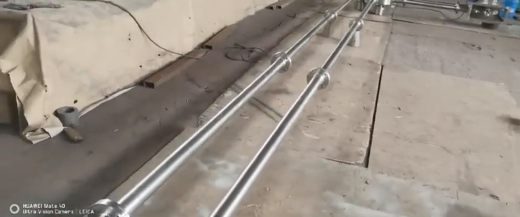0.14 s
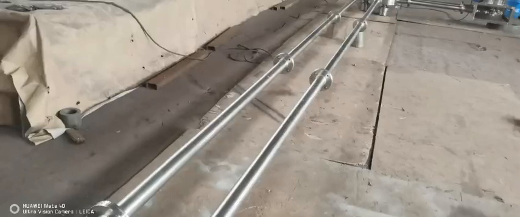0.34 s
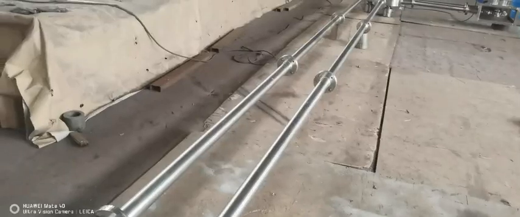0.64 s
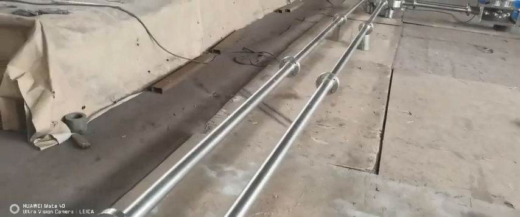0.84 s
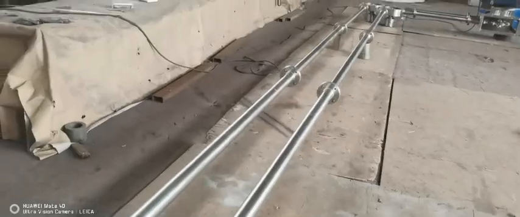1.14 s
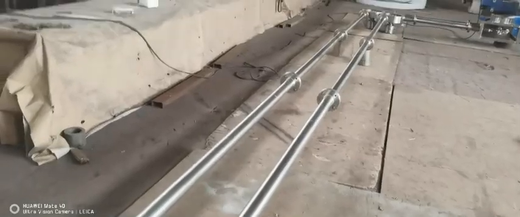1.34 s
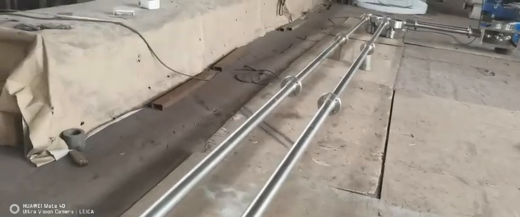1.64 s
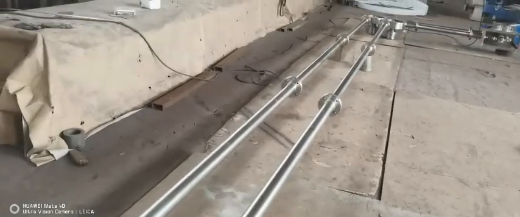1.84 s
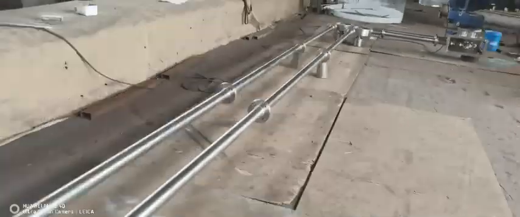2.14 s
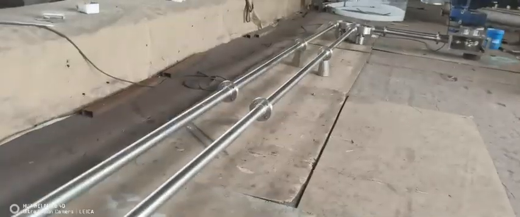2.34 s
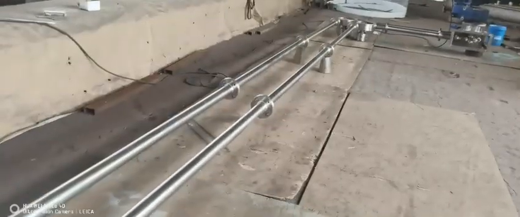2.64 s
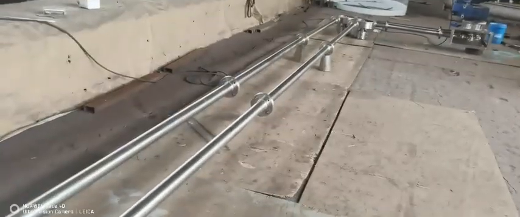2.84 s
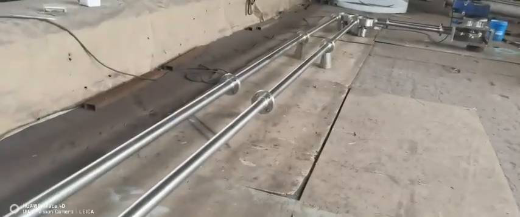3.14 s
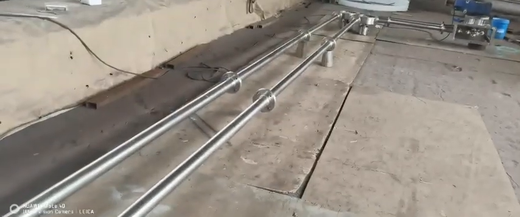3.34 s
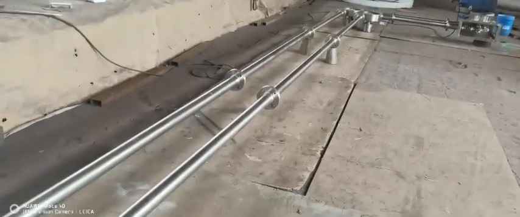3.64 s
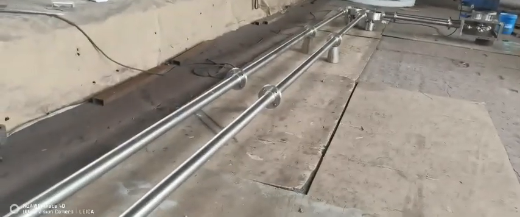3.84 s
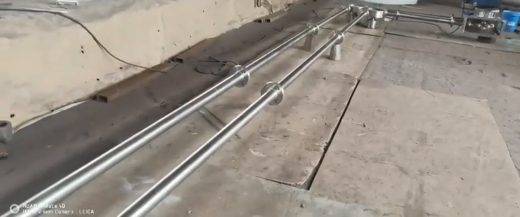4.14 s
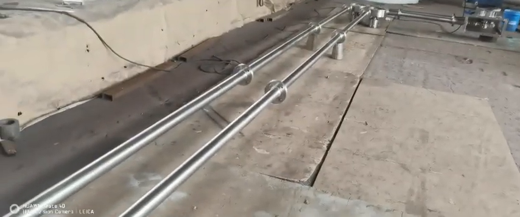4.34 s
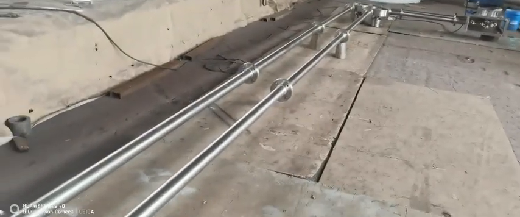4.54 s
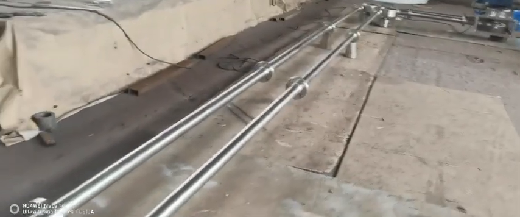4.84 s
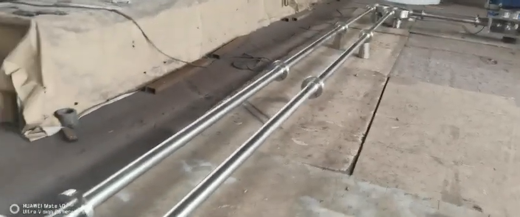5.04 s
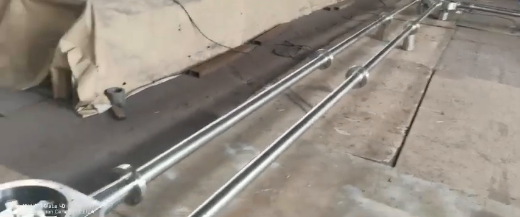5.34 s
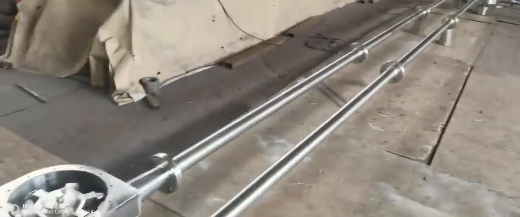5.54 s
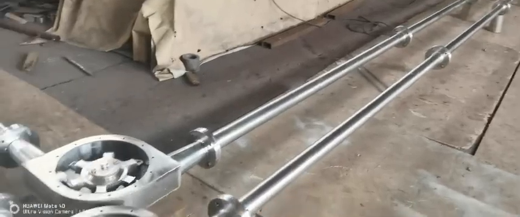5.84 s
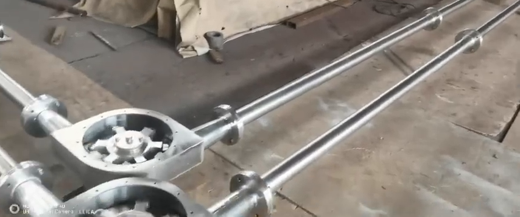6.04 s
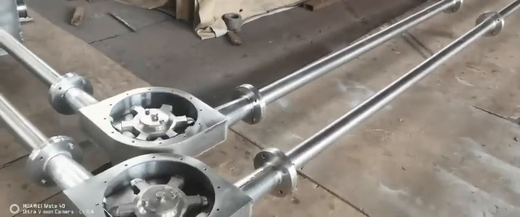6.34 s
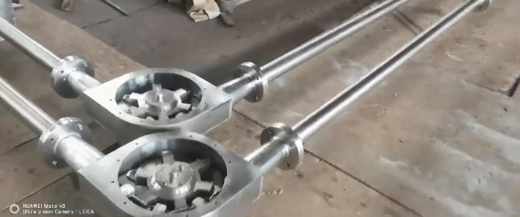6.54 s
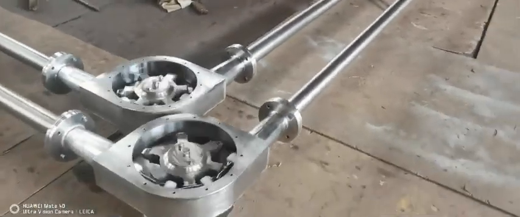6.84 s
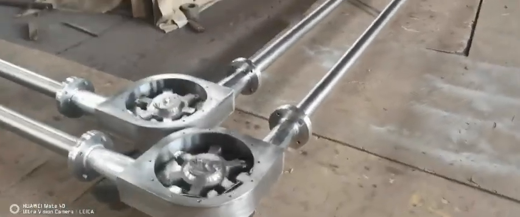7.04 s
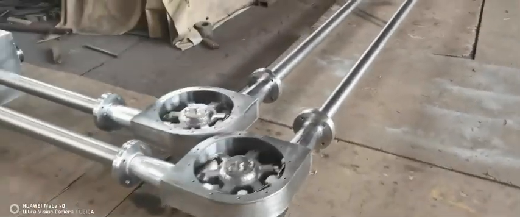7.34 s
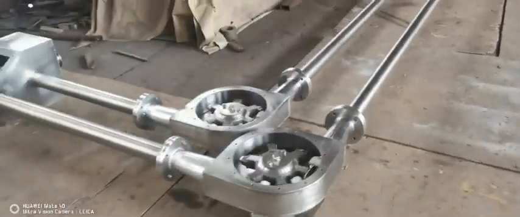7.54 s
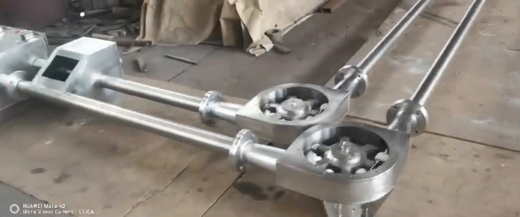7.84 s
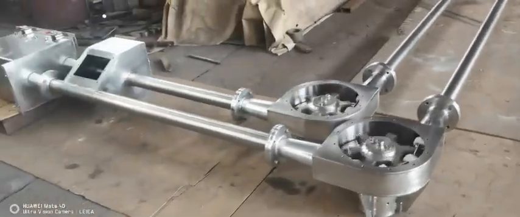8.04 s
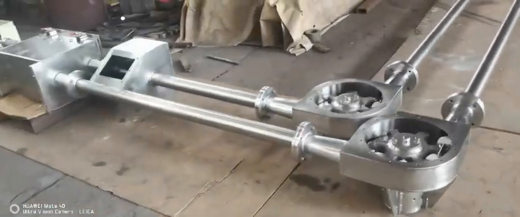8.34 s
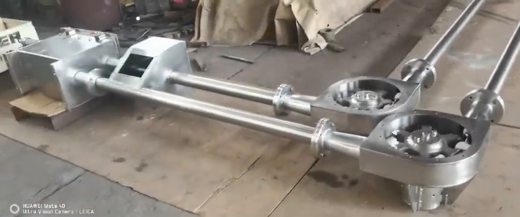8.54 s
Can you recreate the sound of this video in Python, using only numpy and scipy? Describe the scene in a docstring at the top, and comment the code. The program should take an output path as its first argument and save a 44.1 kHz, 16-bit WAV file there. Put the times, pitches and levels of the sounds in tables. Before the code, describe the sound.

A chain conveyor runs close by in a factory hall for nearly nine seconds. Its discs rub inside steel tubes with a steady low booming hum and soft irregular thuds, strongest around 3.9 and 6.6 seconds, while links tick lightly over the sprockets until about 6.3. Behind it lie a machine rumble, hiss and thin, gliding high motor whines. At about 1.9 seconds something heavy is dragged with a short broad roar. A distant grinder hisses on metal from 2.2 to 3.4, from 4.1 to 5.4 and more lightly from 6.5 to 8 seconds, its whine sagging under load and recovering. At 4.7 seconds a hollow housing is knocked once, and a second drag swells and dulls away by 5.6. Rubbed steel rings faintly here and there, with a run of short ringing tones from 7.4 seconds to the end.

```python
"""A tubular chain conveyor runs on a factory floor: discs rub and thud through the steel tube, which booms low,
and links tick over the sprockets. Farther off the hall murmurs, motors whine, rubbed steel and the ground work
ring, and a grinder hisses and bogs down when pressed on the work. Twice something heavy is dragged with a broad
roar; once a hollow housing is knocked."""
import sys
import numpy as np
from scipy import signal
from scipy.fft import rfft, irfft
from scipy.io import wavfile
from scipy.ndimage import uniform_filter1d

SR = 44100
rng = np.random.default_rng(int(sys.argv[2]) if len(sys.argv) > 2 else 0)


def dump(signal):
    """Clip the signal to [-1, 1] and save it as 16-bit WAV at the path in sys.argv[1]."""
    limited = np.clip(np.atleast_2d(signal).T, -1, 1)
    pcm = np.round(limited * 32767).astype(np.int16)
    wavfile.write(sys.argv[1], SR, pcm)


N = 383669
TIME_S = np.arange(N) / SR


def amp(db):
    return 10 ** (np.asarray(db) / 20)


def unit_rms(x):
    return x / np.sqrt(np.mean(x ** 2) + 1e-20)


def highpass(x, order, hz):
    return signal.sosfilt(signal.butter(order, hz, "high", fs=SR, output="sos"), x)


def curves(rows):
    """Columns after the time column, interpolated per sample."""
    times_s, *columns = np.transpose(rows)
    return [np.interp(TIME_S, times_s, column) for column in columns]


def drift(rate_hz):
    """Slow unit-rms noise: two one-pole low-passes at SR / 40."""
    r = np.exp(-2 * np.pi * rate_hz * 40 / SR)
    slow = signal.lfilter([1], [1, -2 * r, r * r], rng.standard_normal(N // 40 + 2002))[2000:]
    return np.interp(np.arange(N) / 40, np.arange(len(slow)), unit_rms(slow))


def resonate(x, hz, width_hz):
    """One resonance, unit peak gain."""
    r = np.exp(-np.pi * width_hz / SR)
    poles = [1, -2 * r * np.cos(2 * np.pi * hz / SR), r * r]
    return signal.lfilter([(1 - r * r) / 2, 0, (r * r - 1) / 2], poles, x + 1e-18)


def body(x, modes):
    """Parallel resonances, alternating signs."""
    return sum((-1) ** k * amp(db) * resonate(x, hz, width_hz)
               for k, (hz, width_hz, db) in enumerate(modes))


def strike(blows, modes, spread_db):
    """Each blow rings every mode at a random strength."""
    times_s, levels_db = np.transpose(blows)
    scatter_db = spread_db * rng.normal(0, 1, (len(blows), len(modes)))
    out = np.zeros(N)
    for k, (hz, db, t60_s) in enumerate(modes):
        clicks = np.zeros(N)
        clicks[(times_s * SR).astype(int)] = amp(levels_db + db + scatter_db[:, k])
        r, w = amp(-60 / (t60_s * SR)), 2 * np.pi * hz / SR
        out += signal.lfilter([0, np.sin(w)], [1, -2 * r * np.cos(w), r * r], clicks + 1e-18)
    return out


def coloured_noise(spectrum, flicker_db, tilt_db_oct=0.0):
    """Flickering fifth-octave noise bands, tilted above 1.5 kHz."""
    points_hz, points_db = np.transpose(spectrum)
    edges_hz = points_hz[0] * 2 ** np.arange(0, np.log2(points_hz[-1] / points_hz[0]) + .1, 1 / 5)
    white, common = rng.standard_normal((2, N)), drift(4.5)
    out = power = 0
    for k, (low, high) in enumerate(zip(edges_hz, edges_hz[1:])):
        hz = np.sqrt(low * high)
        db = np.interp(np.log(hz), np.log(points_hz), points_db)
        band = signal.sosfilt(signal.butter(2, [low, high], "band", fs=SR, output="sos"), white[k % 2])
        power += amp(2 * db) * np.mean(band ** 2)
        wander_db = flicker_db * (0.38 * common + drift(7.5))
        out += band * amp(db + wander_db + tilt_db_oct * max(0, np.log2(hz / 1500)))
    return out / np.sqrt(power)


def wavering_tone(hz, blur_hz, steady, flicker_db=3):
    """A tone plus the narrow noise band that hall scattering makes of it."""
    phase = 2 * np.pi * np.cumsum(hz) / SR
    tone = (steady + drift(blur_hz)) * np.sin(phase) + drift(blur_hz) * np.cos(phase)
    return unit_rms(tone) * amp(flicker_db * drift(10.8))


def echoes(x, t60_s, tail_db):
    """Direct sound plus a decaying noise tail; power kept."""
    t = np.arange(int(t60_s * SR)) / SR
    response = rng.standard_normal(len(t)) * amp(-60 * t / t60_s) * (t > .004)
    response *= amp(tail_db) / np.sqrt(np.sum(response ** 2))
    response[0] = 1
    return signal.fftconvolve(x, response)[:len(x)] / np.sqrt(1 + amp(2 * tail_db))


def shifting_ripple(x, t60_s, tail_db, step_s):
    """Short random echoes, redrawn every step, give a shifting, finely rippled colour."""
    hop = int(step_s * SR)
    window = np.hanning(2 * hop + 1)[:-1]
    padded, out = np.pad(x, (hop, 2 * hop)), np.zeros(N + 5 * hop)
    for i in range(0, N + hop, hop):
        stretch = np.pad(padded[i:i + 2 * hop] * window, (0, hop))
        out[i:i + 3 * hop] += echoes(stretch, t60_s, tail_db)
    return out[hop:hop + N]


# steel tube modes: (frequency [Hz], width [Hz], gain [dB])
TUBE_MODES = [(159.8, 16.4, -1), (172.2, 20.2, 1), (221.7, 24.7, -5.5), (301.2, 20, -10.5),
              (111, 19, -18.5)]
# rubbing in the tube: (time [s], level [dB])
RUB_LEVELS = [(0.0, -27), (0.5, -37), (1.5, -32.5), (2.4, -33.5), (3.7, -36.5), (3.95, -26), (4.3, -36),
              (5.0, -31.5), (5.5, -34), (6.5, -33.5), (7.5, -35), (8.7, -35.5)]

def disc_rub(period_s=0.35, tight_s=0.27, throb_db=1):
    """Rubbing discs drive the tube modes; one swell per passing disc."""
    db, = curves(RUB_LEVELS)
    throb = np.cos(2 * np.pi * (TIME_S - tight_s) / period_s)
    return amp(db + throb_db * throb) * unit_rms(body(rng.standard_normal(N), TUBE_MODES))


# hall murmur: (time [s], low part [dB], high part [dB])
MURMUR_LEVELS = [(0.0, -36, -35.5), (0.51, -36.5, -36), (1.74, -33.5, -36), (2.28, -30.5, -31),
                 (3.03, -28.5, -32), (3.7, -33.5, -33.5), (4.31, -31.5, -31.5), (4.75, -27.5, -34),
                 (5.43, -35, -36.5), (6.18, -37, -37.5), (6.98, -35.5, -32), (7.41, -37.5, -31.5),
                 (7.8, -34, -32.5), (8.15, -34, -33), (8.7, -36, -33)]
# spectra of the two parts: (frequency [Hz], relative density [dB])
MURMUR_LOW = [(18, -79), (30, -38), (75, -57), (108, -15.5), (124, -12), (143, -5), (162, -1.5),
              (241, -17.5), (305, -14), (400, -26.5), (520, -17), (823, -15), (1100, -17.5), (1300, -21.5),
              (1690, -62), (2860, -120)]
MURMUR_HIGH = [(1400, -31), (1750, 2), (2100, -1.5), (3300, 2.5), (4200, 1.5), (5800, -1), (7000, 1),
               (8000, -4.5), (8500, -13.5), (9700, -1.5), (11500, -10.5), (14000, -20)]

def hall_murmur():
    """Flickering rumble and hiss."""
    low_db, high_db = curves(MURMUR_LEVELS)
    rumble = amp(low_db) * coloured_noise(MURMUR_LOW, flicker_db=2.5)
    return rumble + amp(high_db) * coloured_noise(MURMUR_HIGH, flicker_db=2.0)


# narrow murmur bands: (time [s], lower band [dB], upper band [dB])
BAND_LEVELS = [(0.0, -46.5, -55), (1.69, -49.5, -62), (1.99, -33, -51), (2.11, -46, -48), (2.32, -39, -51),
               (3.0, -53, -38.5), (3.9, -42.5, -54.5), (4.65, -50, -43), (4.94, -55, -35), (5.31, -67, -43),
               (5.82, -52, -56.5), (6.76, -50.5, -53.5), (7.61, -61, -45), (8.7, -53, -56)]
# their resonances: (frequency [Hz], width [Hz])
BAND_RESONANCES = [(395, 110), (1420, 350)]

def murmur_bands():
    """Two noise bands rise and sink independently."""
    out = 0
    for db, (hz, width_hz) in zip(curves(BAND_LEVELS), BAND_RESONANCES):
        band = resonate(rng.standard_normal(N), hz, width_hz)
        out += amp(db) * unit_rms(resonate(band, hz, width_hz))
    return out


# motor whines, one list each: (time [s], pitch [Hz], level [dB])
MOTOR_CURVES = [
    [(.35, 8030, -53), (.7, 8020, -41), (1.1, 8015, -45), (1.6, 8008, -42), (2.4, 7990, -46),
     (3.5, 7985, -40), (4.35, 8010, -37), (4.7, 8010, -42), (5.0, 8015, -48), (6.25, 8012, -51)],
    [(0, 8125, -46), (.4, 8050, -49), (.7, 8010, -44), (1.2, 7950, -42), (1.9, 7870, -42), (2.1, 7850, -58)],
    [(2.6, 8150, -56), (3.0, 8200, -51), (4.0, 8130, -50), (4.6, 8220, -46), (5.3, 8225, -47),
     (6.0, 8050, -58)],
    [(6.25, 7960, -48), (6.5, 7860, -45), (7.1, 7710, -38), (7.5, 7670, -38), (7.75, 7645, -43),
     (8.0, 7630, -40), (8.25, 7625, -36), (8.7, 7650, -40)],
    [(6.65, 7960, -52), (6.9, 7900, -45), (7.5, 7850, -45), (8.0, 7810, -43), (8.7, 7800, -44)],
]

def motor_whines(fade_s=.02):
    """Gliding motor tones, blurred by the hall."""
    out = 0
    for rows in MOTOR_CURVES:
        hz, db = curves(rows)
        start_s, end_s = rows[0][0], rows[-1][0]
        gate = np.clip(np.minimum(TIME_S - start_s, end_s - TIME_S) / fade_s + 1, 0, 1)
        out += gate * amp(db) * wavering_tone(hz, blur_hz=30, steady=1.3)
    return out


# rings of rubbed steel, and of the workpiece while the grinder presses: (start [s], end [s], pitch [Hz], width
# [Hz], level [dB])
STEEL_RINGS = [(0, .65, 3235, 22, -45), (.78, 1.4, 4850, 20, -45), (1.43, 1.76, 3520, 18, -42),
               (1.7, 1.8, 1715, 40, -42), (2.27, 2.38, 3220, 25, -37), (2.6, 3.9, 3235, 22, -44),
               (2.4, 4.3, 590, 16, -46), (2.0, 4.7, 5200, 50, -48), (0, 1.9, 8650, 30, -53),
               (3.98, 4.27, 10000, 60, -40), (7.43, 7.58, 1620, 20, -42), (7.72, 7.86, 1619, 20, -38),
               (7.92, 8.05, 1614, 20, -40), (8.1, 8.27, 1615, 28, -40), (8.28, 8.46, 1615, 28, -41),
               (8.51, 8.62, 1612, 30, -46), (8.18, 8.62, 3210, 40, -40), (8.22, 8.45, 2935, 25, -43),
               (8.48, 8.7, 2937, 20, -41), (7.76, 7.83, 2170, 40, -38), (4.78, 5.2, 965, 25, -33),
               (5.2, 5.45, 965, 30, -41), (8.56, 8.8, 4658, 22, -40), (8.38, 8.5, 4670, 60, -42),
               (6.4, 6.8, 4550, 60, -48), (.67, .75, 1700, 50, -45), (2.5, 2.8, 2930, 50, -37),
               (2.6, 3.4, 3075, 40, -39), (2.42, 2.95, 4200, 130, -38), (2.55, 2.9, 4720, 25, -43),
               (2.9, 3.45, 2460, 90, -39), (4.3, 4.8, 3000, 170, -34), (4.3, 4.65, 4290, 80, -42),
               (6.8, 6.9, 3320, 60, -39), (6.9, 7.12, 3460, 80, -41), (6.85, 7.08, 2140, 40, -43),
               (7.4, 7.75, 3110, 70, -42), (7.7, 7.92, 3217, 40, -40), (7.5, 7.9, 4495, 30, -42),
               (7.35, 7.8, 4680, 50, -43), (7.25, 7.6, 2760, 60, -46)]

def steel_rings(clear_width_hz=23, fade_share=.3):
    """Steel rings swell and sink back; narrow rings hold as clear tones."""
    out = np.zeros(N)
    for start_s, end_s, hz, width_hz, db in STEEL_RINGS:
        span = slice(int(start_s * SR), int(end_s * SR))
        t = TIME_S[span]
        ramp = np.clip(np.minimum(t - start_s, end_s - t) / (fade_share * (end_s - start_s)), 0, 1)
        phase = 2 * np.pi * hz * t
        ring = (clear_width_hz / width_hz + drift(width_hz)[span]) * np.sin(phase)
        ring += drift(width_hz)[span] * np.cos(phase)
        out[span] += np.sin(np.pi / 2 * ramp) * amp(db) * unit_rms(ring)
    return out


# grinding contact: (time [s], level [dB], high modes re low [dB], top modes re low [dB])
GRIND_LEVELS = [(0.0, -49.5, 7, 10), (1.04, -45.5, 0, 5.5), (1.9, -51, 6, 12.5), (2.25, -37, 5, -18),
                (2.32, -31.5, -6, -2), (2.42, -36, -2, -9), (2.6, -29.5, 1.5, -12), (3.22, -29.5, -6, -6.5),
                (3.39, -32.5, -3.5, 0.5), (3.63, -35.5, -8, -6.5), (3.95, -38.5, -6, -1),
                (4.07, -34, 0.5, 3), (4.55, -32.5, -1.5, -2), (4.88, -30, -2, -5), (5.06, -31.5, -3, -20),
                (5.2, -33.5, -6, -14), (5.43, -42, -11, -5), (6.3, -48.5, 4, 6), (6.6, -45.5, 4, 4.5),
                (6.98, -38, -4, -3), (7.4, -36, -7, -3), (7.7, -38.5, 1, -0.5), (7.8, -34.5, 2, 2),
                (7.87, -39, 6.5, 7), (7.97, -39, 4.5, 4), (8.09, -40.5, 4, -7), (8.7, -52, 6.5, 7)]
# workpiece modes: (frequency [Hz], width [Hz], gain [dB])
WORK_LOW_MODES = [(2193, 265, 4), (2493, 57, 7.5), (2586, 60, 5.5), (2765, 84, 7), (2960, 68, 6),
                  (3085, 47, 7), (3225, 113, 4)]
WORK_HIGH_MODES = [(4110, 770, 4.5), (4780, 170, 8), (5030, 400, 3)]
WORK_TOP_MODES = [(7180, 380, 2.5), (9800, 1300, 2)]
# highest hiss: (time [s], level [dB])
AIR_LEVELS = [(0.0, -47), (1.84, -51), (1.91, -34), (2.25, -63), (2.3, -42), (2.71, -53), (3.34, -38),
              (3.93, -50), (4.09, -38), (5.94, -52.5), (6.66, -41), (7.9, -38.5), (8.63, -42), (8.7, -47)]
# its resonances: (frequency [Hz], width [Hz], gain per pass [dB])
AIR_MODES = [(11840, 1400, 0), (13600, 770, -4)]

def grinder_hiss(wander_db=1.8):
    """Grit scratches ring the workpiece; modes wax and wane as the contact wanders."""
    db, high_db, top_db = curves(GRIND_LEVELS)
    air_db, = curves(AIR_LEVELS)
    grit = rng.standard_normal((4, N)) * amp(drift(42))
    grit = highpass(grit, order=4, hz=1800)   # fine grit holds no bass
    ringing = []
    for scratches, modes in zip(grit, (WORK_LOW_MODES, WORK_HIGH_MODES, WORK_TOP_MODES)):
        wandering = [(hz, width_hz, gain_db + wander_db * drift(2.2)) for hz, width_hz, gain_db in modes]
        ringing.append(unit_rms(body(scratches, wandering)))
    low, high, top = ringing
    air = amp(air_db) * unit_rms(body(body(grit[3], AIR_MODES), AIR_MODES))
    return air + amp(db) * (low + amp(high_db) * high + amp(top_db) * top)


# disc thuds: (time [s], peak [dB], pitch [Hz])
DISC_THUDS = [(0.041, -26, 176), (0.092, -23.5, 151.6), (0.277, -27.5, 165.7), (0.61, -20.5, 159),
              (0.667, -21, 175), (0.986, -23.5, 167.7), (1.438, -21.5, 160.5), (1.571, -23, 159),
              (1.709, -22, 172), (1.962, -29, 179), (2.17, -19, 167), (2.394, -20, 162.4), (2.49, -35, 184),
              (2.817, -19, 171), (2.98, -23, 163), (3.172, -23, 157), (3.53, -23.5, 169), (3.9, -13.5, 171),
              (4.001, -21, 165), (4.044, -19.5, 164.5), (4.353, -19.5, 167), (4.387, -19.5, 171.5),
              (4.669, -19.5, 161.8), (4.768, -20, 195), (4.826, -28, 175), (4.863, -25, 185),
              (5.193, -17.5, 179.5), (5.261, -23, 179), (5.386, -24, 183.6), (5.468, -22, 177),
              (5.516, -19.5, 164.5), (5.809, -21.5, 167.4), (5.979, -17.5, 161.8), (6.085, -23.5, 167),
              (6.141, -22, 163), (6.271, -19, 170.7), (6.304, -18.5, 167.5), (6.401, -28, 168),
              (6.536, -19.5, 166), (6.574, -23, 163.4), (6.644, -14.5, 172.4), (6.882, -23.5, 169.4),
              (7.056, -17.5, 164), (7.22, -19.5, 159), (7.337, -32, 175), (7.48, -26.5, 171),
              (7.661, -33, 162), (7.77, -21, 166.4), (7.838, -27, 172), (8.026, -23, 162),
              (8.114, -19.5, 165.5), (8.582, -23.5, 162.4), (8.643, -23, 167.6)]

def disc_thuds(rise_s=0.018, sharpness=0.99, soft_count=30):
    """Soft plastic contact builds up, then the tube rings out; quieter thuds fall at random."""
    soft_s = rng.random(soft_count) * N / SR
    soft_db = -28.5 - 0.5 * rng.standard_normal(soft_count)
    soft_hz = rng.normal(166.5, 5.4, soft_count)
    t = np.arange(int(.2 * SR)) / SR
    swell = (t / rise_s * np.exp(1 - t / rise_s)) ** sharpness
    out = np.zeros(N)
    for start_s, db, hz in [*DISC_THUDS, *zip(soft_s, soft_db, soft_hz)]:
        i = int(start_s * SR)
        thud = amp(db) * swell * np.sin(2 * np.pi * (hz * t + rng.random()))
        out[i:i + len(t)] += thud[:N - i]
    return out


# links meeting sprocket teeth: (time [s], relative level [dB], ping pitch [Hz])
LINK_TICKS = [(0.197, -16, 6800), (0.364, -22, 6980), (0.575, -15, 9100), (0.7376, -19, 8400),
              (0.9557, -16, 7660), (1.1174, -24, 7800), (1.4985, -21, 8900), (1.716, -19, 7600),
              (2.0976, -17, 7500), (2.365, -13, 7600), (2.5187, -17, 7160), (3.1204, -19, 7600),
              (3.499, -20, 7980), (3.878, -22, 7500), (4.2608, -19, 7600), (4.637, -12, 7480),
              (5.019, -24, 7580), (5.401, -19, 7500), (5.7937, -24, 7700), (6.31, -24, 8320)]
# link modes: (frequency [Hz], gain [dB], t60 [s])
LINK_MODES = [(3300, -6, 0.006), (4150, -2, 0.006), (5400, -6, 0.005), (6700, 1, 0.006), (7560, 6, 0.007),
              (8800, 2, 0.006), (9600, 1, 0.005), (11000, -6, .004), (12000, -5, .004), (13100, -10, 0.004)]

def link_ticks(touch_count=5, rattle_s=.012, rattle_db=-13, ping_db=-12, ping_t60_s=.045):
    """A link snaps onto a tooth: a short rattle of touches and a ping."""
    lags = rng.random((len(LINK_TICKS), touch_count)) ** 2
    touches = [(start_s + rattle_s * lag, db - 6 * lag)
               for (start_s, db, _), row in zip(LINK_TICKS, lags) for lag in row]
    out = amp(rattle_db) * strike(touches, LINK_MODES, spread_db=4)
    t = np.arange(int(.03 * SR)) / SR
    envelope = np.minimum(t / .004, 1) * amp(-60 * t / ping_t60_s)
    for start_s, db, hz in LINK_TICKS:
        i = int(start_s * SR)
        ping = unit_rms(resonate(rng.standard_normal(len(t)), hz, width_hz=300))
        out[i:i + len(t)] += amp(db + ping_db) * envelope * ping
    return out


# drags: (start [s], crest [s], end [s], crest gain [dB], loss by end [dB],
#         start tilt [dB/oct], end tilt [dB/oct])
DRAGS = [(1.877, 2.08, 2.276, -18, 3.7, 4.8, -1), (4.744, 4.945, 5.58, -20.5, 17.4, 3, -6.5)]
# scrape spectrum: (frequency [Hz], relative density [dB])
DRAG_SPECTRUM = [(35, -63), (60, -44), (106, -2.5), (136, -22), (241, 5.5), (324, -1.5), (372, -13),
                 (535, -3), (807, -5.5), (946, 1), (1870, -17.5), (4160, -15), (6270, -23.5), (7360, -21),
                 (13900, -34.5)]

def drag_roars(attack_s=0.025, release_s=0.0057, swell_db=3.5, boom_s=0.358, boom_fade_s=0.033):
    """A heavy load scrapes, swells and falls away; the boom stops first, the treble dulls."""
    t = TIME_S
    gain = tilt_db_oct = bass_cut = 0
    for start_s, crest_s, end_s, db, loss_db, start_tilt, end_tilt in DRAGS:
        gate = np.clip(np.minimum((t - start_s) / attack_s, (end_s - t) / release_s + 1), 0, 1)
        gain += gate * amp(np.interp(t, [start_s, crest_s, end_s], [db - swell_db, db, db - loss_db]))
        tilt_db_oct += (gate > 0) * np.interp(t, [start_s, end_s], [start_tilt, end_tilt])
        bass_cut += (gate > 0) * np.clip((t - start_s - boom_s) / boom_fade_s, 0, 1)
    full = coloured_noise(DRAG_SPECTRUM, flicker_db=2.0, tilt_db_oct=tilt_db_oct)
    upper = signal.sosfiltfilt(signal.butter(2, 520, "high", fs=SR, output="sos"), full)
    return gain * (full + bass_cut * (upper - full))


# grinder presses: (touch [s], lift [s], loaded pitch [Hz], pressed gain [dB], lifted gain [dB])
GRINDER_PRESSES = [(2.2, 3.38, 7000, -42, -33), (4.13, 5.44, 6650, -36, -42), (6.45, 8.05, 6400, -36, -38)]

def grinder_gear(start_hz=7400., free_hz=8700, sag_s=.8, recover_s=.6, case_hz=7620, case_width_hz=620):
    """Gear whine sags under load, recovers when lifted and peaks at the case resonance."""
    hz, db = np.full(N, start_hz), np.full(N, -90.)
    for touch_s, lift_s, loaded_hz, pressed_db, lifted_db in GRINDER_PRESSES:
        stages = (touch_s, loaded_hz, sag_s, pressed_db), (lift_s, free_hz, recover_s, lifted_db)
        for start_s, goal_hz, lag_s, gain_db in stages:
            i = int(start_s * SR)
            hz[i:] = goal_hz + (hz[i] - goal_hz) * np.exp((start_s - TIME_S[i:]) / lag_s)
            db[i:] = gain_db
    case_gain = 1 / (1 + ((hz - case_hz) / case_width_hz) ** 2) ** 2
    envelope = uniform_filter1d(amp(db), size=SR // 8)
    whine = envelope * case_gain * wavering_tone(hz, blur_hz=100, steady=.4)
    return echoes(whine, t60_s=.55, tail_db=-4)


# blow on the housing: (time [s], level [dB])
HOUSING_BLOWS = [(4.727, -15)]
# housing modes: (frequency [Hz], gain [dB], t60 [s])
HOUSING_MODES = [(485, 3, 0.11), (257.5, 2, 0.1), (540, -5, 0.1), (350, -8, .04), (950, -10, 0.05),
                 (1900, -14, .015)]

def housing_knock():
    """One blow rings a hollow housing."""
    return strike(HOUSING_BLOWS, HOUSING_MODES, spread_db=1.5)


def scene():
    """Far noises get a shifting, finely rippled colour; ticks and knock get the hall's tail."""
    far = hall_murmur() + murmur_bands() + grinder_hiss() + grinder_gear() + drag_roars()
    far = shifting_ripple(far, t60_s=0.063, tail_db=-8, step_s=.3)
    hits = highpass(link_ticks() + housing_knock(), order=2, hz=150)   # ticks and knock carry no bass
    near = echoes(hits, t60_s=0.41, tail_db=-8)
    return (far + near + disc_rub() + disc_thuds() + motor_whines() + steel_rings())[None]


def record(dry):
    """Microphone: no deep bass, less sensitive above its resonance, steep top cut."""
    shelf_hz, shelf_db, cutoff_hz = 8300, -3.5, 13950
    dry = highpass(dry, order=3, hz=40)
    hz = np.arange(N // 2 + 1) * SR / N
    shelf = amp(shelf_db * np.clip((hz - shelf_hz) / 150, 0, 1))
    shelved = irfft(rfft(dry) * shelf, N)
    return signal.sosfilt(signal.ellip(12, .5, 70, cutoff_hz, fs=SR, output="sos"), shelved)


dry = scene()
out = record(dry)
dump(out)
```